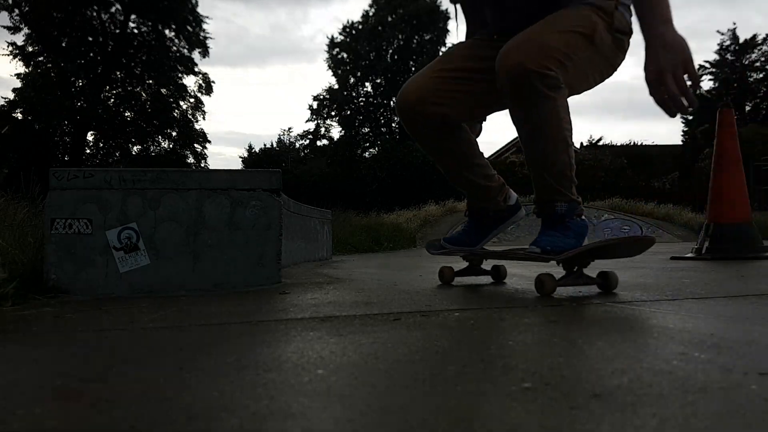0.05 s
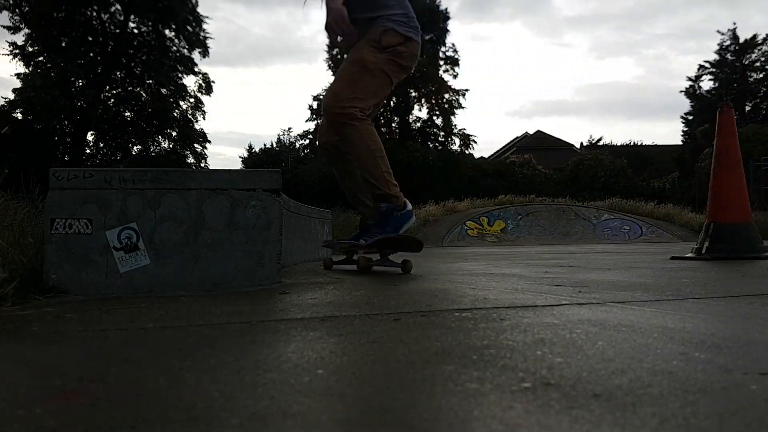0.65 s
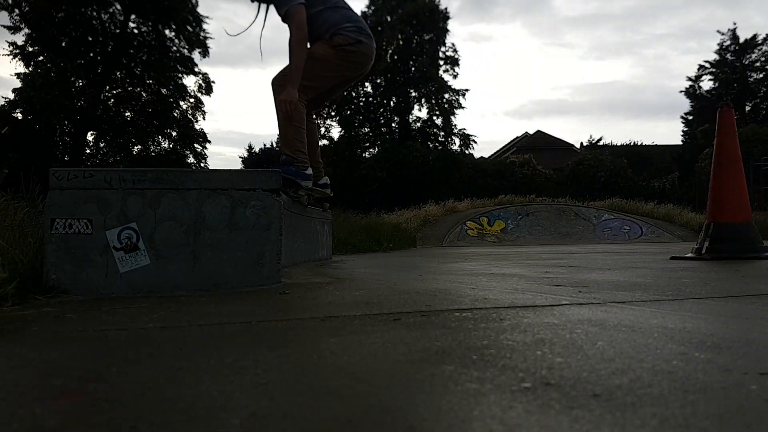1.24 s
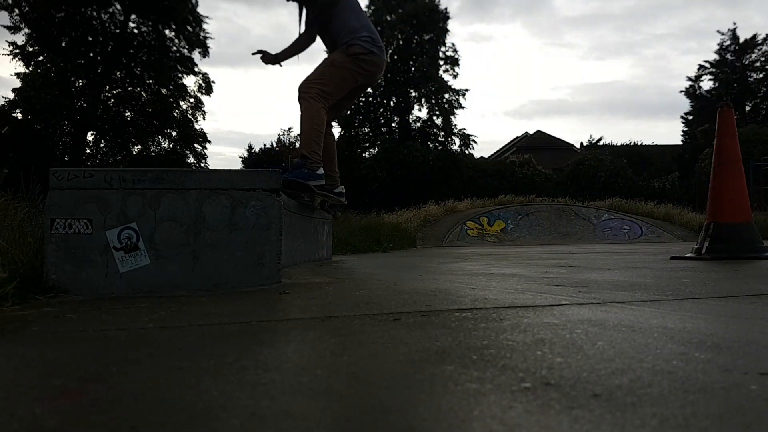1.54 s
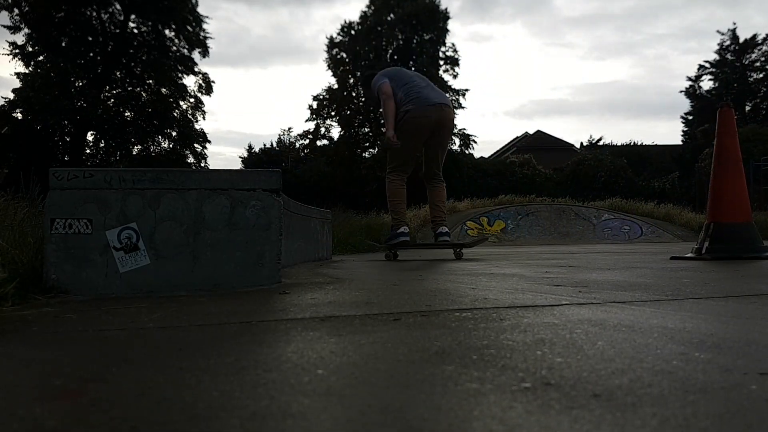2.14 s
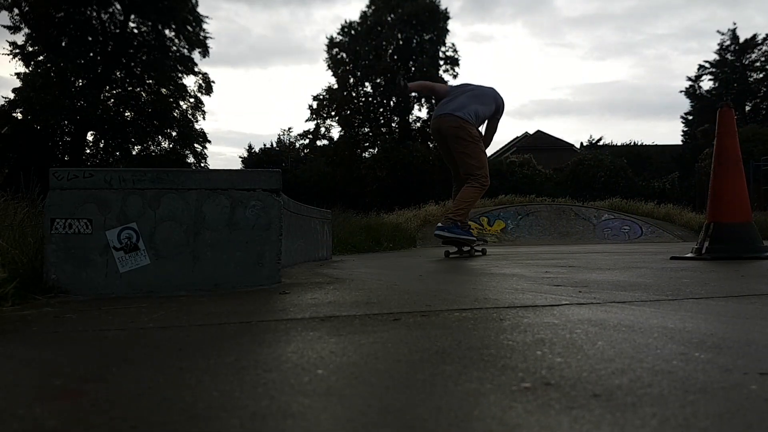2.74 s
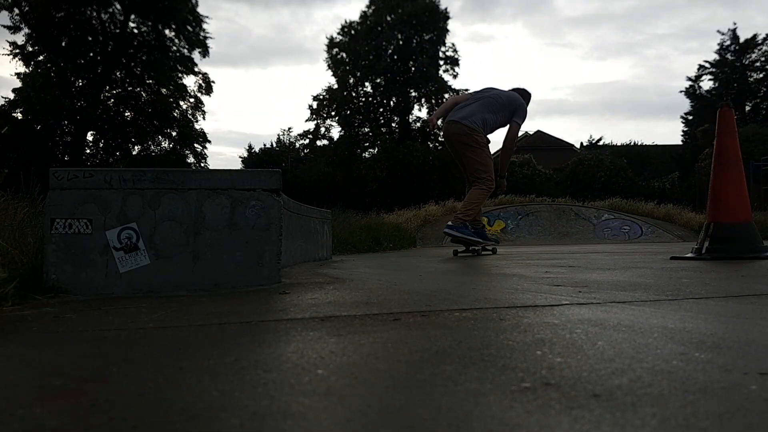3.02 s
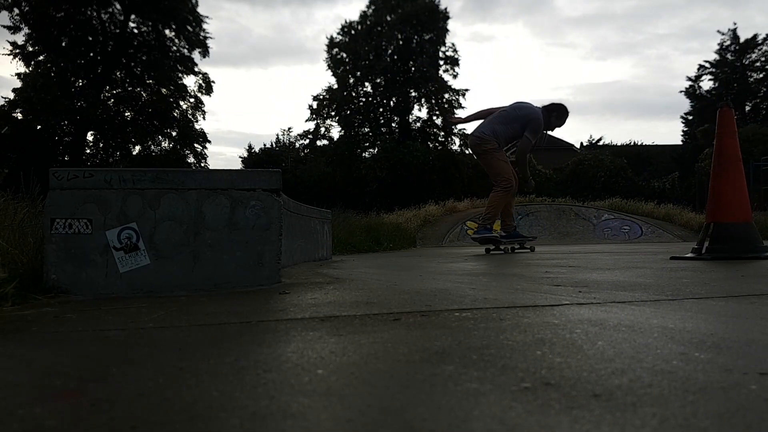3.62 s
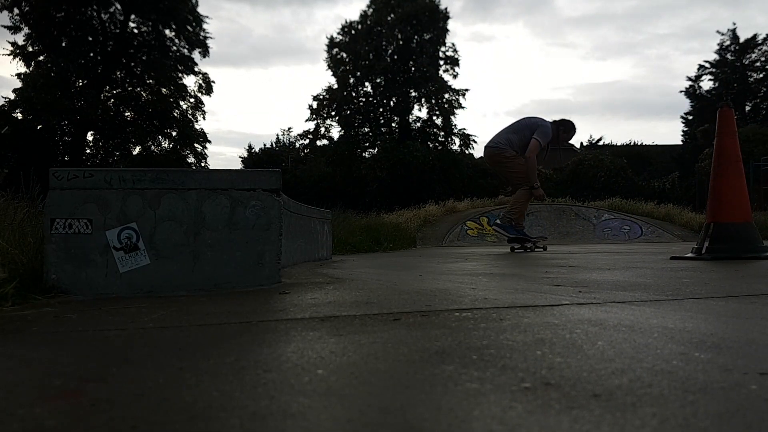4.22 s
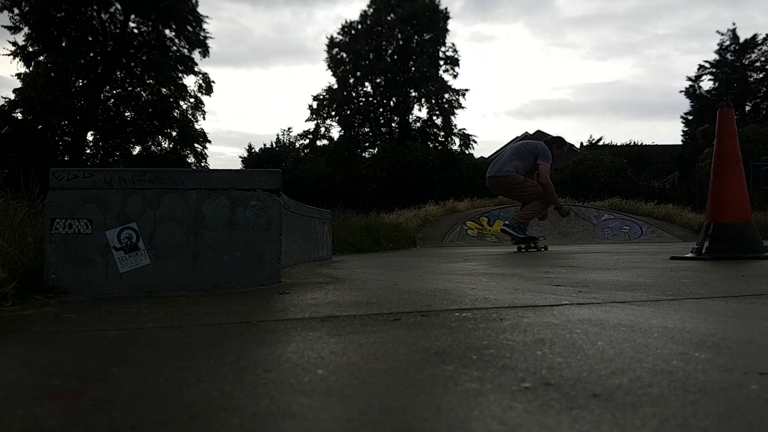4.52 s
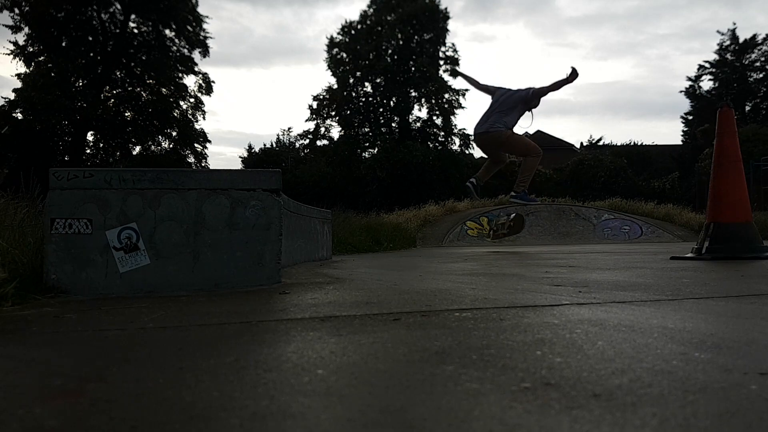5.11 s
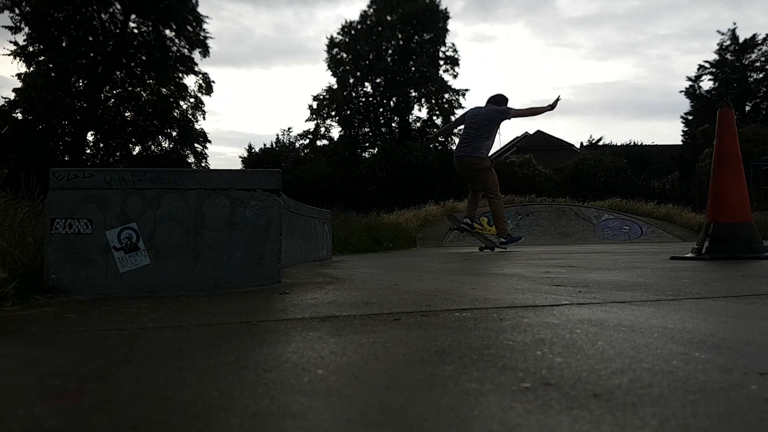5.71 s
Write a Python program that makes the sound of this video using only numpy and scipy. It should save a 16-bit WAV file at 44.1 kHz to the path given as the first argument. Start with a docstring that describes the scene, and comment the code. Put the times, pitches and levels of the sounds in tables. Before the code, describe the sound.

A skateboard rolls on concrete, pops onto a ledge, grinds briefly, drops off, squeals through a pivot and lands another trick farther away.

```python
"""A skateboard rolls past on a concrete park, pops onto a ledge, grinds along it and drops off,
pivots with a squeal of the wheels, rolls away over slab joints and lands a second trick farther off.
Each contact rings the wooden deck and shakes the loose trucks; joints send a thump through the slab.
Shoes rasp on grip tape, urethane sticks and slips, and the wheels roar on the rough ground.
Heard close and low down in stereo, with a thin echo from ledge, ramps and trees."""
import sys
import numpy as np
from scipy import signal
from scipy.fft import rfft, irfft, next_fast_len
from scipy.io import wavfile
from scipy.ndimage import map_coordinates

SR = 44100
rng = np.random.default_rng(int(sys.argv[2]) if len(sys.argv) > 2 else 0)


def materialize(psi):
    """Save the field psi as 16-bit PCM at rate SR to the path in sys.argv[1].

    A 1-D psi becomes a single channel; in a 2-D psi each row is a channel.
    """
    bounded = np.clip(np.atleast_2d(psi).T, -1, 1)
    quanta = np.round(bounded * 32767).astype(np.int16)
    wavfile.write(sys.argv[1], SR, quanta)


N = 262836
TIME = np.arange(N) / SR
FREQS = np.maximum(np.fft.rfftfreq(N, 1 / SR), 1)
START_M, AWAY_M_PER_S = 1.68, 1.27   # the rider moves steadily away
DISTANCE_M = START_M + AWAY_M_PER_S * TIME

# borders of a knock's six bands (thud, wheel clunk, deck, ply snap, crack, top octave): edge_hz
KNOCK_EDGES_HZ = [90, 380, 800, 1600, 3500, 7000, 16000]
# how alike left and right are for a close sound: frequency_hz, coherence
COHERENCE_NEAR = [(130, 1), (640, .96), (1410, 0.91), (3100, .5), (7000, 0.024), (15000, 0.062)]
# the same for a wide, diffuse sound: frequency_hz, coherence
COHERENCE_FAR = [(130, 0.96), (290, 0.87), (640, 0.41), (1410, 0.154), (3100, .28), (7000, .04)]


def knock(levels_db, top_loss_db, buzz, buzz_s=0.02, chatter=0.19, chatter_s=0.0041, ring_t60_s=0.046,
          detune=0.023, scatter=0.18, scatter_s=0.0089, scatter_hz=2600, soft_hz=2100,
          crack_lift_db=2, top_db=-4):
    """One contact: a click and the chatter of loose trucks ring the board, balanced in six bands."""
    # modes of deck and trucks: pitch_hz, gain_db (over the bare contact)
    modes = [(210, 1.5), (275, 21.5), (335, 6.5), (440, 3.5), (505, 5.5), (580, -9), (650, 5.5), (740, 2.5),
             (834, 2), (920, 10.5), (1066, 19), (1162, 5.5), (1250, 5.5), (1346, 1.5), (1491, 1.5),
             (1590, 0.5), (1727, 2.5), (1830, 9.5), (2000, 10), (2300, 10.5), (2753, 2.5), (3036, 1)]
    t = np.arange(SR // 6) / SR
    click = 1. * (t == 0)
    shake = chatter * np.exp(-t / chatter_s) + buzz * np.exp(-t / buzz_s)
    contact = click + shake * grains(len(t), spread_db=5.5)
    width_hz = np.log(1000) / np.pi / ring_t60_s
    body = contact
    for hz, db in modes:
        # the rider's weight shifts the modes a little from blow to blow
        strength, load = rng.standard_normal(2)
        body = body + from_db(db + 3.7 * strength) * resonance(contact, hz * (1 + detune * load), width_hz)
    # rough ground scatters the treble differently to left and right
    spray = scatter * rng.standard_normal((2, len(t))) * np.exp(-t / scatter_s)
    spray = spray - dull(spray, scatter_hz)
    wood = dull(body + spray, soft_hz, order=2)
    sources = [wood] * len(levels_db) + [contact + spray]   # the top octave skips the ringing
    *body_db, crack_db = levels_db
    bands_db = [*body_db, crack_db + crack_lift_db, crack_db + top_db - top_loss_db]
    out = 0
    for source, db, low, high in zip(sources, bands_db, KNOCK_EDGES_HZ, KNOCK_EDGES_HZ[1:]):
        part = band(source, low, high, order=2 if low < 500 else 3)
        out = out + from_db(db) * part / np.std(part[:, t < 0.012])   # the attack sets the level
    return out


def knocks(hits, colour_db, buzz, pivot_hz=800, top_loss_db_per_m=0.5, low_cut_hz_per_m=24):
    """Contacts of one colour: a sharper blow tilts brighter, distance trims both thud and top."""
    out, edges = np.zeros((2, N)), np.array(KNOCK_EDGES_HZ)
    centres_hz = np.sqrt(edges[:-1] * edges[1:])
    octaves = np.log2(centres_hz / pivot_hz)[:len(colour_db)]
    for start_s, db, tilt_db, crack_db in hits:
        metres = np.interp(start_s, TIME, DISTANCE_M)
        levels_db = db + np.append(colour_db + tilt_db * octaves, crack_db)
        blow = knock(levels_db, top_loss_db_per_m * metres, buzz)
        add(out, start_s, band(blow, low_cut_hz_per_m * metres, SR / 2))
    return out


def deck_strikes():
    """The wooden deck or tail strikes: a dry clack with little buzz from the trucks."""
    # blows on the wood, levels relative: start_s, level_db, tilt_db_per_octave, crack_db
    hits = [(.7867, -19, 2.5, -22), (.8082, -27, -1.5, -27), (.992, -38, -1, -44),
            (1.2396, -41.5, -1.5, -38), (1.703, -53, 1, -22), (1.7356, -28, 3, -31),
            (1.9777, -23.5, -2.5, -19.5), (2.6025, -34, -0.5, -15), (4.9072, -24, .5, -26),
            (5.2103, -29, 2, -14.5)]
    # tone of a wood strike: thud_db, clunk_db, deck_db, snap_db
    colour_db = [-7.5, -4, -0.5, -5.5]
    return knocks(hits, colour_db, buzz=0.0094)


def wheel_strikes():
    """A pair of wheels lands or meets a joint: a clunk that leaves the trucks buzzing."""
    # blows on the wheels, levels relative: start_s, level_db, tilt_db_per_octave, crack_db
    hits = [(1.0147, -21.5, 3.5, -14), (1.022, -20, 1, -23), (1.0391, -24, 2, -10.5),
            (1.614, -48.5, -.5, -19.5), (1.904, -42.5, -2, -20.5), (1.936, -45.5, 0, -20),
            (1.9848, -29.5, -2.5, -8.5), (1.9987, -17.5, -1.5, -28.5), (2.3336, -41.5, 0, -15.5),
            (2.3462, -41.5, -4.5, -26.5), (2.5917, -36, -1, -16), (3.3203, -31.5, 0, -18),
            (3.815, -45, -2.5, -21), (4.922, -33.5, 1, -18.5), (5.2, -43, 0.5, -23),
            (5.2693, -20, 1, -22.5), (5.2816, -27.5, -1.5, -11.5), (5.374, -39, 0, -18),
            (5.8919, -28, -3, -17), (5.896, -25, 0, -20.5)]
    # tone of a wheel strike: thud_db, clunk_db, deck_db, snap_db
    colour_db = [-8.5, 0.5, -5, -8.5]
    return knocks(hits, colour_db, buzz=0.029)


def slab_thumps(start_hz=174, end_ratio=0.35, rise_s=0.0026, fall_s=0.0093):
    """Bending waves in the slab: the higher pitches arrive first, so each thump sinks."""
    # wheels drop into slab joints: start_s, peak_db
    drops = [(1.01, -32), (1.105, -34.5), (1.13, -40), (1.968, -31), (1.996, -31), (2.214, -50),
             (3.313, -38.5), (3.391, -37), (3.807, -52), (3.905, -40), (5.114, -53), (5.938, -47)]
    out, t = np.zeros(N), np.arange(SR // 10) / SR
    swell = (t / rise_s / 2) ** 2 * np.exp(2 - t / rise_s)
    pitch_hz = start_hz * (end_ratio + (1 - end_ratio) * np.exp(-t / fall_s))
    thump = swell * np.sin(2 * np.pi * np.cumsum(pitch_hz) / SR)
    for start_s, db in drops:
        add(out, start_s, from_db(db) * thump)
    return out


def grind(start_s=1.0415):
    """A truck bites into the ledge and slows to a stall."""
    # rasp and ring of the truck: centre_hz, width_octaves, level_db
    layers = [(1003, 2.93, -38.5), (3200, 1.34, -66), (4400, 0.28, -43.5)]
    scrape = sum(from_db(db) * rub(hz, octaves) for hz, octaves, db in layers)
    return scrape * envelope(start_s, attack_s=0.01, hold_s=0.063, release_s=0.041)


def skid(start_s=2.602, hold_s=0.06, squeal_db=-33.5, swell_db=16.5, rasp=0.49, hiss_db=-52):
    """Urethane sticks and slips in the pivot, squealing louder until it grips, over a gritty hiss."""
    # narrow resonances of the skidding wheels: pitch_hz, relative_db
    partials = [(501, 0), (1110, -7), (1230, -10), (1360, -7.5), (1620, -1), (2620, -16)]
    tone = 0
    for hz, db in partials:
        ring = resonance(resonance(rng.standard_normal(N), hz, hz / 30), hz, hz / 30)
        phase = np.angle(signal.hilbert(ring, next_fast_len(N))[:N])
        tone = tone + from_db(db) * np.cos(phase)   # wavering pitch, steady strength
    scrape = rms_one(band(grains(N, spread_db=3), 250, 1900))
    slide_left = np.clip(1 - (TIME - start_s) / hold_s, 0, 1)
    squeal = from_db(squeal_db - swell_db * slide_left) * (rms_one(tone) + rasp * scrape)
    hiss = from_db(hiss_db) * rub(hz=3520, octaves=3.9)
    return (squeal + hiss) * envelope(start_s, attack_s=0.006, hold_s=hold_s, release_s=0.0093)


def wheel_scrubs():
    """Urethane scrubs sideways on the concrete under the rider's weight."""
    # sideways slips: start_s, length_s, level_db, centre_hz
    slips = [(0.66, 0.15, -44.5, 1160), (0.722, 0.053, -37, 386), (1.253, 0.18, -56, 1350),
             (1.551, 0.071, -50.5, 1120), (1.64, 0.018, -49.5, 1300), (1.733, 0.063, -46.5, 1190),
             (3.268, 0.061, -52.5, 910), (4.058, 0.102, -63, 690), (4.617, .32, -67, 397),
             (5.247, .15, -52, 555), (5.871, 0.073, -50, 500)]
    out = np.zeros(N)
    for start_s, length_s, db, hz in slips:
        add(out, start_s, from_db(db) * stroke(length_s, hz, octaves=1.05))
    return out


def shoe_drags(hiss_db=-12):
    """Grip tape rasps and hisses under the shoes."""
    # foot movements: start_s, length_s, level_db
    drags = [(0.677, 0.079, -55), (1.731, 0.068, -61), (2.182, 0.036, -65.5), (3.266, 0.051, -66),
             (3.451, .084, -66), (3.707, 0.086, -61), (4.296, 0.026, -74), (4.588, 0.019, -69),
             (5.632, .059, -56.5)]
    out = np.zeros(N)
    for start_s, length_s, db in drags:
        rasp = stroke(length_s, hz=3100, octaves=1.93)
        hiss = from_db(hiss_db) * stroke(length_s, hz=11000, octaves=0.8)
        add(out, start_s, from_db(db) * (rasp + hiss))
    return out


def hardware_rattle(attack_s=0.017, hold_s=0.053, release_s=0.046):
    """Loose washers and bearings chatter after a hard blow, then settle."""
    # bursts of chatter: start_s, level_db
    bursts = [(2.015, -59.5), (4.92, -57.5), (5.28, -46.5)]
    level = sum(from_db(db) * envelope(start_s, attack_s, hold_s, release_s) for start_s, db in bursts)
    return level * rub(hz=2700, octaves=0.66)


def bushing_creak(start_s=2.96, length_s=0.17, slips_per_s=88, jitter=0.25, tick_s=0.0025, level_db=-69.5):
    """A truck bushing slips in small uneven steps as the rider leans."""
    steps = np.arange(0, length_s * slips_per_s)
    slips_s = start_s + (steps + jitter * rng.standard_normal(len(steps))) / slips_per_s
    ticks = sum(envelope(s, attack_s=tick_s / 10, hold_s=0, release_s=tick_s) for s in slips_s)
    return from_db(level_db) * ticks * rub(hz=3700, octaves=1.3)


def wheel_roar(gain_db=2, near_m=3.77, far_m=5.04):
    """Wheels on rough concrete: a direct roar that crossfades to a diffuse, gritty one with distance."""
    # swell and fade of the rolling: time_s, relative_db
    fader = [(0.0, -48), (0.76, -54), (0.91, -56.5), (1.23, -57.5), (1.39, -61), (1.96, -63.5), (2.14, -67),
             (2.44, -74), (2.75, -66.5), (3.68, -64.5), (4.3, -71), (5.38, -63), (5.73, -69), (5.96, -74)]
    # tone of the wheels close by: frequency_hz, relative_db
    near_spectrum = [(150, -10.5), (280, -0.5), (750, -2), (1100, -6), (1550, -15.5), (1820, -11.5),
                     (2650, -25), (3300, -25), (5300, -35), (5900, -30), (6500, -36), (7400, -40),
                     (9000, -35.5), (15000, -36)]
    # their tone across the park: frequency_hz, relative_db
    far_spectrum = [(150, -9.5), (300, 4.5), (550, -1.5), (950, -2), (1600, -6.5), (2700, -10), (3700, -13),
                    (4800, -21), (6300, -24.5), (7500, -31.5), (15000, -31)]
    close = stereo_noise(near_spectrum, COHERENCE_NEAR, spread_db=4)
    distant = stereo_noise(far_spectrum, COHERENCE_FAR, spread_db=2.5) + grit()
    far = np.clip((DISTANCE_M - near_m) / (far_m - near_m), 0, 1)
    return from_db(gain_db + in_time(fader)) * (np.sqrt(1 - far) * close + np.sqrt(far) * distant)


def grit(grains_per_s=60, tick_s=0.0027, relative_db=-14):
    """Wheels run over loose grains; each one ticks in the trucks."""
    struck = 1. * (rng.random(N) < grains_per_s / SR)
    decay = np.exp(-TIME[:SR // 100] / tick_s)
    ticks = signal.fftconvolve(struck, decay)[:N] * rng.standard_normal(N)
    return from_db(relative_db) * rms_one(band(ticks, 700, 3200))


def ground_rumble(gain_db=3):
    """The rolling wheels shake the ground."""
    # swell and fade of the rumble: time_s, relative_db
    fader = [(0.0, -72), (0.94, -64.5), (1.91, -67), (2.37, -73.5), (3.29, -60.5), (3.92, -62),
             (4.5, -77.5), (5.96, -81.5)]
    # low end in the ground: frequency_hz, relative_db
    spectrum = [(18, 10.5), (30, 2), (120, 10), (180, 2.5), (260, 0.5), (500, -42)]
    return from_db(gain_db + in_time(fader)) * stereo_noise(spectrum, COHERENCE_FAR, spread_db=4.5)


def slab_hum(level_db=-40, loss_db_per_m=12, jolt_db=14, jolt_s=0.035, leave_s=0.73):
    """The near slab hums under the wheels: a jolt, then less and less until they leave it."""
    # tone of the slab: frequency_hz, relative_db
    spectrum = [(50, -32), (85, -18), (120, -7), (162, 0), (195, -7), (245, -21), (600, -65)]
    db = level_db - loss_db_per_m * (DISTANCE_M - START_M) + jolt_db * np.exp(-TIME / jolt_s)
    on_slab = envelope(0, attack_s=0.0016, hold_s=leave_s, release_s=0.027)
    return from_db(db) * on_slab * stereo_noise(spectrum, COHERENCE_NEAR, spread_db=2)


def park_echo(x, t60_s=0.51, build_s=0.014, tail_db=-20, far_send_db=3, slap_hz=3500):
    """Dull slaps and a thin scatter from trees and ramps, wetter as the rider moves away."""
    # tone of the tail: frequency_hz, relative_db
    spectrum = [(100, 5), (400, -8), (1200, 0.5), (3000, 0.5), (6000, 8.5), (8500, 7), (14000, -1.5)]
    # reflections off ledge and ramps: delay_s, gain_db
    reflections = [(0.0117, -44), (0.0228, -23), (.034, -27.5), (.052, -43.5), (.105, -39.5)]
    t = TIME[:SR]
    scatter = stereo_noise(spectrum, COHERENCE_FAR, spread_db=4)[:, :SR]
    tail = scatter * from_db(-60 * t / t60_s) * (1 - np.exp(-t / build_s))
    tail *= from_db(tail_db) / np.sqrt(np.sum(tail ** 2) / 2)
    slaps = np.zeros(SR)
    for delay_s, db in reflections:
        slaps[int(delay_s * SR)] = from_db(db)
    send = x * from_db(far_send_db * DISTANCE_M / DISTANCE_M[-1])
    return signal.fftconvolve(send[None], tail + dull(slaps, slap_hz), axes=-1)[:, :N]


def pan_with_rider(x):
    """The rider's bearing delays one channel against the other."""
    # the rider's bearing: time_s, left_lead_ms
    bearing = [(0, -0.061), (.95, 0.087), (1.73, .088), (2.3, -0.022), (5.9, -0.068)]
    shift = in_time(bearing) / 1000 * SR / 2   # each side takes half
    return np.array([map_coordinates(channel, [np.arange(N) + side * shift], order=3)
                     for channel, side in zip(x, (1, -1))])


def rub(hz, octaves, size=N):
    """Gritty friction that catches and slips; rms 1."""
    half_width = 2 ** (octaves / 2)
    catching = from_db(1.5 * rms_one(dull(rng.standard_normal(size), 70, order=2)))
    return rms_one(band(grains(size, spread_db=4.5) * catching, hz / half_width, hz * half_width))


def stroke(length_s, hz, octaves):
    """A short rub that swells and fades."""
    sound = rms_one(rub(hz, octaves, size=N // 10)[:int(length_s * SR)])
    return sound * signal.windows.tukey(len(sound), 0.5)


def grains(size, spread_db, grain_samples=22):
    """Dense tiny impacts whose strength varies from one half millisecond to the next."""
    strengths = from_db(spread_db * np.clip(rng.standard_normal(size // grain_samples + 1), -2, 2))
    return rms_one(rng.standard_normal(size) * np.repeat(strengths, grain_samples)[:size])


def stereo_noise(spectrum, coherence, spread_db):
    """Coloured grainy noise with a mid of rms 1, wider where the coherence is low."""
    alike, colour = np.clip(by_hz(coherence), 0, 1), from_db(by_hz(spectrum))
    width = np.sqrt((1 - alike) / (1 + alike))
    mid = irfft(rfft(grains(N, spread_db)) * colour, N)
    side = irfft(rfft(grains(N, spread_db)) * colour * width, N)
    return np.array([mid + side, mid - side]) / np.std(mid)


def envelope(start_s, attack_s, hold_s, release_s):
    """Rise, hold, then die away."""
    t = TIME - start_s
    return np.clip(t / attack_s, 0, 1) * np.exp(-np.maximum(t - hold_s, 0) / release_s)


def resonance(x, hz, width_hz):
    """One resonance with gain 1 at its peak."""
    r = np.exp(-np.pi * width_hz / SR)
    feedback = [1, -2 * r * np.cos(2 * np.pi * hz / SR), r * r]
    return signal.lfilter(np.array([1, 0, -1]) * (1 - r * r) / 2, feedback, x)


def band(x, low_hz, high_hz, order=2):
    """Band-pass."""
    edges_hz = [max(low_hz, 15), min(high_hz, 0.45 * SR)]
    return signal.sosfilt(signal.butter(order, edges_hz, "band", fs=SR, output="sos"), x)


def dull(x, hz, order=1):
    """Low-pass."""
    return signal.sosfilt(signal.butter(order, hz, fs=SR, output="sos"), x)


def from_db(db):
    """Decibels to gain."""
    return 10 ** (np.asarray(db) / 20)


def rms_one(x):
    """Scale to rms 1."""
    return x / np.sqrt(np.mean(x ** 2) + 1e-20)


def in_time(points):
    """A time curve at every sample."""
    return np.interp(TIME, *np.transpose(points))


def by_hz(points):
    """A spectrum curve at every frequency."""
    hz, value = np.transpose(points)
    return np.interp(np.log(FREQS), np.log(hz), value)


def add(track, start_s, sound):
    """Mix a sound in at a time."""
    at = int(start_s * SR)
    track[..., at:at + sound.shape[-1]] += sound[..., :N - at]


def scene():
    """The board's knocks and friction, panned and echoed, over the bed of rolling."""
    impacts = from_db(-1) * (deck_strikes() + wheel_strikes()) + slab_thumps()
    board = impacts + shoe_drags() + wheel_scrubs() + hardware_rattle() + grind() + skid() + bushing_creak()
    echo = park_echo(board.mean(axis=0))
    rolling = ground_rumble() + wheel_roar() + slab_hum()
    return pan_with_rider(board) + echo + rolling


def record(dry, cutoff_hz=15750):
    """Left and right differ in the treble; the very top is cut steeply."""
    # tonal balance of the two microphone ports: frequency_hz, left_minus_right_db
    balance = [(1200, -.3), (2600, -1.8), (4600, -2.8), (6500, -.5), (8500, 4.5), (12000, 6.5)]
    gains = from_db(by_hz(balance) * np.array([[1], [-1]]) / 2)
    coloured = irfft(rfft(dry) * gains, N)
    return signal.sosfilt(signal.ellip(10, 0.2, 70, cutoff_hz, fs=SR, output="sos"), coloured)


dry = scene()
out = record(dry)
materialize(out)
```